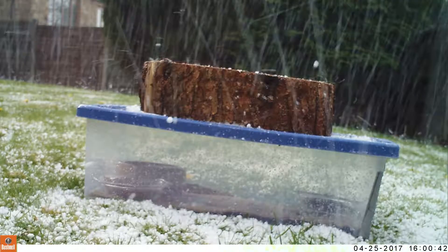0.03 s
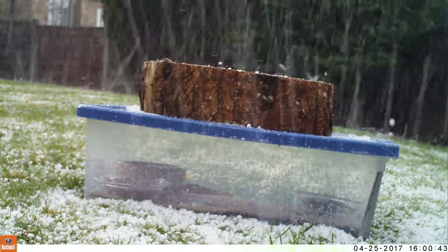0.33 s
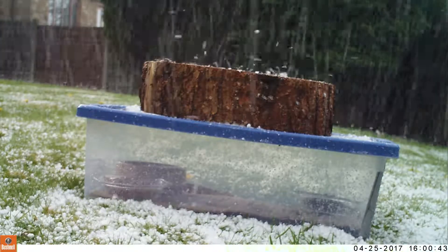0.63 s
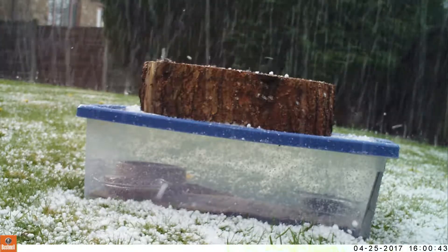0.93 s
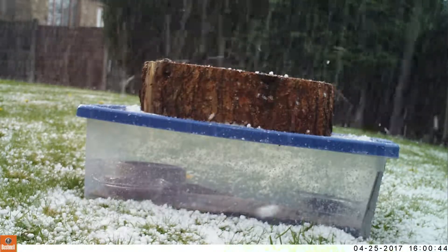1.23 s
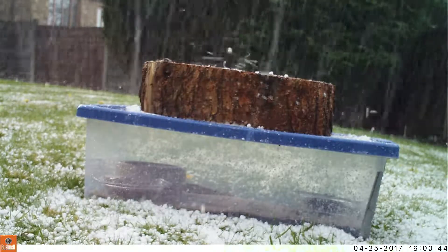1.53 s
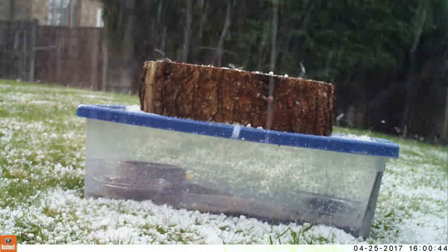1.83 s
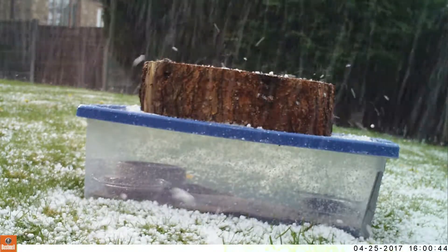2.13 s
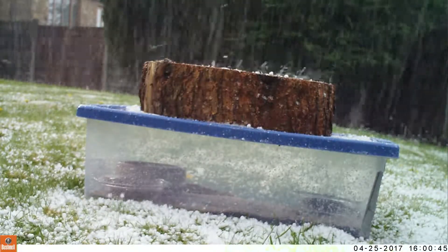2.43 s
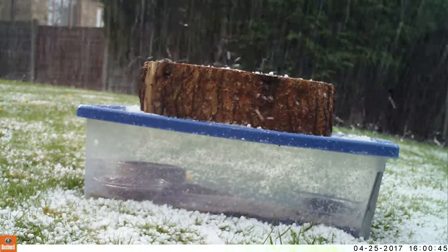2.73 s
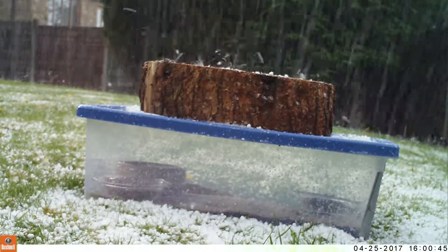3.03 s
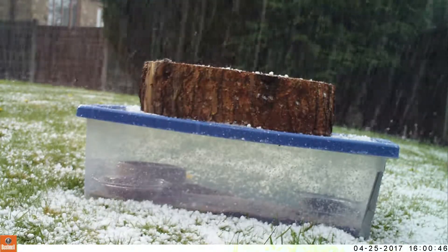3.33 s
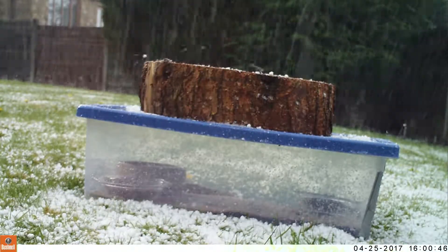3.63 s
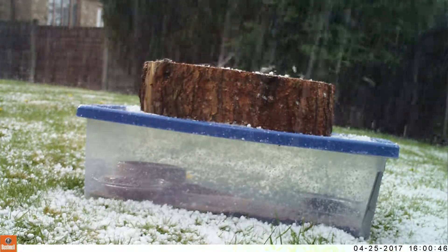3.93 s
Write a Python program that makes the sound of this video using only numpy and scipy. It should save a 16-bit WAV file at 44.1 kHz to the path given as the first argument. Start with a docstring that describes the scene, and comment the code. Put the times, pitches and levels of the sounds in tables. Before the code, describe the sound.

Heavy hail hisses on a garden lawn throughout, with close stones landing as sharp, ringing ticks and faint icy clinks. Wind rumbles and thumps on the microphone, strongest around 0.5 and 1.5 seconds, then dies away by about 3 seconds. Between 1.7 and 2.9 seconds a few stones knock hollowly on a plastic box. The sharpest close hit comes near 3.8 seconds as the hail keeps falling.

```python
"""A garden in heavy hail, with stones falling on a lawn, a log and a plastic box.
Countless far stones merge into a bed of hiss; nearer ones ping, tick and clink on fallen ice,
and a few knock on the box. A sharp ring near 4 kHz, probably the microphone's port, colours the hail.
Underneath, gusts of wind buffet the microphone and die away."""
import sys
import numpy as np
from scipy import signal
from scipy.io import wavfile
from scipy.ndimage import uniform_filter1d

SR = 44100
rng = np.random.default_rng(int(sys.argv[2]) if len(sys.argv) > 2 else 0)


def master_out(mix):
    """Clip the mix to full scale and print it as 16-bit PCM to the path in sys.argv[1]."""
    frames = np.transpose(np.atleast_2d(mix))
    ceiling = np.clip(frames, -1, 1)
    pcm = np.round(ceiling * 32767).astype(np.int16)
    wavfile.write(sys.argv[1], SR, pcm)


N = 176400

# gust envelopes: (time [s], relative rumble level [dB], relative flutter level [dB])
GUST_LEVELS = [(0, -17, -27), (0.15, -21, -34), (0.3, -15, -30), (0.41, -19, -33), (0.48, -13, -27),
               (0.55, -21, -37), (0.65, -25, -42), (0.8, -23, -42), (0.89, -31, -50), (1.03, -24, -45),
               (1.15, -25, -45), (1.22, -19, -34), (1.57, -18, -31.5), (1.64, -26, -46), (1.72, -21, -34),
               (1.77, -30, -51), (2.0, -32, -54), (2.07, -24, -38), (2.17, -28, -48), (2.255, -30, -50),
               (2.28, -22, -38), (2.31, -25, -44), (2.48, -26.5, -48), (2.72, -35, -65), (2.84, -31, -64),
               (2.93, -41, -67), (3.01, -34, -53), (3.13, -44, -64), (3.28, -37, -66), (3.55, -42, -66),
               (3.75, -50, -61), (4.0, -47, -60)]
# tone of the wind's low rumble: (frequency [Hz], relative density [dB])
RUMBLE_SPECTRUM = [(20, 2), (40, -5), (80, -4), (130, -8.5), (200, -18), (300, -26.5), (500, -59)]
# tone of the flutter above it: (frequency [Hz], relative density [dB])
FLUTTER_SPECTRUM = [(100, -0.5), (210, 7), (340, -0.5), (500, -7), (800, -16.5), (1300, -22.5), (2200, -27),
                    (3500, -31)]
# brief buffets within the gusts: (time [s], level [dB])
WIND_BUFFETS = [(0.05, -25.5), (0.278, -24), (0.378, -23), (0.471, -26), (.748, -34), (0.801, -31),
                (1.001, -33), (1.309, -32), (1.428, -28), (1.568, -31), (1.709, -32), (2.063, -36),
                (2.338, -37)]
# strong eddies thumping the microphone: (time [s], depth before the low cut [dB], time to a quarter [s])
EDDY_THUMPS = [(0.012, 0, 0.00085), (0.105, -13, 0.0013), (0.801, -10.5, 0.0013), (1.21, -7.5, 0.0017),
               (1.28, -20, 0.003), (1.383, -6, 0.0049), (1.43, -20.5, 0.00018), (1.49, -14.5, 0.00093),
               (1.57, -19, 0.00025), (1.692, -10, 0.0017), (2.277, -10.5, 0.002), (3.015, -20, 0.0026)]
# strength of the shower: (time [s], gain [dB])
SHOWER_GAIN = [(0, 2), (1.6, 2), (2.1, 2), (2.3, 0.5), (2.55, 2.5), (3.6, 0.5), (4, 2.5)]
# far hiss before the port colours it: (frequency [Hz], relative density [dB])
HISS_SPECTRUM = [(150, 15.5), (400, 5.5), (800, 2.5), (1150, -4), (1550, 3), (2500, 5), (4000, 6),
                 (6000, -9), (7800, -4.5), (10000, -12), (14000, -6.5)]
# pipe resonances of the microphone's port: (frequency [Hz], width [Hz], gain [dB])
PORT_MODES = [(3910, 416, 16.5), (11970, 2270, 3.5)]
# modes of the plastic box under small stones: (frequency [Hz], relative level [dB])
PLASTIC_MODES = [(1530, 13), (1850, -10), (2800, -11)]
# small ice chips ringing all around: (frequency [Hz], relative level [dB])
ICE_MODES = [(5400, 14.5), (6300, 9.5), (8300, -27), (11600, 8.5), (12400, 9)]
# ice chips clinking close by: (time [s], peak before the shower gain [dB], pitch [Hz])
ICE_CLINKS = [(1.397, -44, 8550), (1.915, -40, 11200), (2.161, -41, 11800), (2.358, -40, 11700),
              (2.520, -36, 12100), (2.989, -35.5, 11800), (3.534, -37.5, 6900), (3.607, -33.5, 12200),
              (3.665, -44, 12300)]
# stones knocking on the box: (time [s], peak [dB], pitch [Hz])
BOX_KNOCKS = [(1.742, -26, 1970), (1.958, -33.5, 1610), (2.463, -33, 1590), (2.652, -31.5, 1580),
              (2.817, -32, 2680), (2.855, -39, 1040)]
# soft landings on the grass close by, plus the hard stone at 3.8386 s ringing on (row at 3.8387) and its two
# soft # bounces (rows at 3.8445 and 3.8517): (time [s], peak [dB], ring [Hz])
SOFT_LANDINGS = [(0.3083, -27, 3920), (0.5906, -31, 3900), (0.6391, -25, 3700), (0.7744, -23.5, 3720),
                 (1.476, -27, 3900), (1.7176, -30, 3800), (1.8259, -24, 3710), (2.5056, -27, 4000),
                 (2.5171, -27.5, 3880), (2.5458, -26.5, 3820), (2.6277, -25.5, 3860), (3.8387, -21.5, 3860),
                 (3.8445, -32, 3780), (3.8517, -32, 3870), (3.9215, -28, 4020)]
# hard landings close by: (time [s], peak [dB], ring [Hz], thud against ring [dB], crack against both [dB])
HARD_LANDINGS = [(0.0438, -15.5, 3850, -10, -10), (0.0513, -19, 3840, 5, -12.5),
                 (0.0892, -23, 3700, -4, -11), (0.4273, -20, 3770, -20, -6.5), (0.652, -32, 4300, -17, -17),
                 (0.8126, -22, 3800, -3, -7.5), (0.8787, -24.5, 3880, -13, -16),
                 (1.5988, -14.5, 4020, -8.5, -7), (1.7391, -12, 3820, -29, -24),
                 (1.7437, -20, 3960, -3, -2), (1.8811, -22, 3770, -3, -18), (1.9586, -18, 3410, -8, -19),
                 (2.075, -18, 3890, -24, -10), (2.0961, -27, 3730, -14, -19),
                 (2.175, -26.5, 3880, -13, -12), (2.368, -19, 3450, -3, -26), (2.493, -21, 3840, -24, -6),
                 (2.911, -21.5, 3830, -5, -26), (3.5356, -25, 3530, -2, -9), (3.7654, -26, 4000, -5, 2),
                 (3.8386, -10.5, 3740, 9.5, 1)]


def from_db(db):
    """Decibels to gain."""
    return 10 ** (np.asarray(db) / 20)


def rms_one(x):
    """Scale to rms 1."""
    return x / np.sqrt(np.mean(x ** 2) + 1e-20)


def peak_one(x):
    """Scale to peak 1."""
    return x / np.abs(x).max()


def even(x, seconds=0.1017):
    """Ride out the slow swells of a noise, leaving its fast flicker; rms about 1."""
    return x / np.sqrt(uniform_filter1d(x * x, int(seconds * SR)) + 1e-12)


def envelopes(rows):
    """One envelope for each level column of a breakpoint table."""
    times, *columns = np.transpose(rows)
    return [np.interp(np.arange(N) / SR, times, column) for column in columns]


def add(out, s, sound):
    """Mix a short sound in at s seconds."""
    i = int(s * SR)
    out[i:i + len(sound)] += sound[:N - i]


def cut(x, hz, kind, order=2):
    """Butterworth filter."""
    sos = signal.butter(order, np.clip(hz, 10, .45 * SR), kind, fs=SR, output="sos")
    return signal.sosfilt(sos, x + 1e-18)


def resonate(x, hz, width_hz):
    """A resonance with gain 1 at its top."""
    r = np.exp(-np.pi * width_hz / SR)
    poles = [1, -2 * r * np.cos(2 * np.pi * hz / SR), r * r]
    return signal.lfilter(np.array([1, 0, -1]) * (1 - r * r) / 2, poles, x + 1e-18)


def drift(hz):
    """Smooth random modulation, mostly slower than hz; rms about 1."""
    step, run_in = 20, 4000
    r = np.exp(-2 * np.pi * hz * step / SR)
    white = rng.standard_normal(N // step + run_in + 2)
    slow = signal.lfilter([1], [1, -2 * r, r * r], white)[run_in:]
    return np.interp(np.arange(N) / step, np.arange(len(slow)), rms_one(slow))


def noise(spectrum, flicker_db, tilt_db=0):
    """Third-octave noise bands, each flickering on its own, tilted by tilt_db per octave; rms 1."""
    edges = 18 * 2 ** np.arange(0, 9.9, 1 / 3)
    hz, db = np.transpose(spectrum)
    white, out = rng.standard_normal((2, N + SR // 2)), 0
    for k, (low, high) in enumerate(zip(edges, edges[1:])):
        if low < hz[-1]:
            band = cut(white[k % 2], [low, high], "band")[-N:]
            level_db = np.interp(np.log(low * high) / 2, np.log(hz), db) + tilt_db * np.log2(low / 50)
            out = out + band * from_db(level_db + flicker_db * drift(hz=30.4))
    return rms_one(out)


def impacts(per_s, spread_db):
    """Random clicks, mostly small, now and then large."""
    sizes = from_db(spread_db * np.minimum(rng.exponential(1, N), 4))
    return sizes * rng.choice([-1, 1], N) * (rng.random(N) < per_s / SR)


def port(x):
    """The microphone's port rings at its first two pipe resonances."""
    return x + sum(from_db(db) * resonate(x, hz, width_hz) for hz, width_hz, db in PORT_MODES)


def wind(rumble_trim_db=1.5, flutter_trim_db=2.5):
    """Gusts rumble on the microphone and tear into flutter; strong eddies pull the pressure down."""
    t = np.arange(N) / SR
    rumble_db, flutter_db = envelopes(GUST_LEVELS)
    turbulence = np.minimum(drift(hz=66), 2)
    tilt_db = .24 * (rumble_db - rumble_db.max())   # the rumble darkens as the wind drops
    rumble = even(noise(RUMBLE_SPECTRUM, flicker_db=2.5, tilt_db=tilt_db) * from_db(1.6 * turbulence))
    flutter = even(noise(FLUTTER_SPECTRUM, flicker_db=4.0) * from_db(4.5 * turbulence))
    gusts = from_db(rumble_db + rumble_trim_db) * rumble + from_db(flutter_db + flutter_trim_db) * flutter
    bursts = sum(from_db(db) * np.exp(-((t - s) / 0.0098) ** 2) for s, db in WIND_BUFFETS)
    tearing = even(noise(FLUTTER_SPECTRUM, flicker_db=3.5) * from_db(drift(hz=80)), seconds=0.0205)
    thumps = sum(from_db(db) / (1 + ((t - s) / width) ** 2) ** 2 for s, db, width in EDDY_THUMPS)
    return gusts + bursts * tearing - cut(thumps, 16, "high", order=1)


def hail_bed(hits_per_s=900):
    """Far stones merge into hiss; nearer ones patter, dull on the grass and brighter on the log."""
    grass = cut(impacts(hits_per_s, spread_db=4.5), 3400, "low", order=4)
    log = cut(impacts(hits_per_s, spread_db=4.5), 6000, "low")
    patter = cut(rms_one(grass) + from_db(-9) * rms_one(log), 1700, "high", order=3)
    hiss = noise(HISS_SPECTRUM, flicker_db=2.5)
    return from_db(-59.5) * rms_one(patter) + from_db(-53.5) * hiss


def midground_pings():
    """Stones at middle distance land softly on the grass: narrow blips that set the port ringing."""
    soft = cut(impacts(per_s=110, spread_db=6.0), 3640, "low", order=4)
    return from_db(-64.5) * rms_one(cut(soft, 3160, "high", order=4))


def box_taps():
    """Small stones tap the plastic, each waking one of its short modes."""
    taps = sum(from_db(db) * resonate(impacts(per_s=110, spread_db=3.0), hz, width_hz=75)
               for hz, db in PLASTIC_MODES)
    return from_db(-69) * rms_one(cut(taps, 600, "high"))


def ice_clinks():
    """Stones strike fallen ice: a fine sparkle all around and a few tiny clinks up close."""
    sparkle = sum(from_db(db) * resonate(impacts(per_s=90, spread_db=3.5), hz, width_hz=430)
                  for hz, db in ICE_MODES)
    out = from_db(-62.5) * rms_one(sparkle)
    for s, db, hz in ICE_CLINKS:
        ring = resonate(signal.unit_impulse(SR // 20), hz, width_hz=520)
        add(out, s, from_db(db) * peak_one(resonate(ring, hz, width_hz=2500)))
    return out


def box_knocks():
    """A few stones hit the box, each with one short, hollow note."""
    out, click = np.zeros(N), signal.unit_impulse(SR // 20)
    for s, db, hz in BOX_KNOCKS:
        add(out, s, from_db(db) * peak_one(resonate(click, hz, width_hz=240)))
    return out


def close_pings(attack_s=0.001):
    """Close stones sink into the grass without a click: the ring takes a few cycles to build, then fades."""
    out, t = np.zeros(N), np.arange(SR // 50) / SR
    swell = peak_one((t * np.exp(-t / attack_s)) ** 2)
    for s, db, hz in SOFT_LANDINGS:
        add(out, s, from_db(db) * swell * np.sin(2 * np.pi * hz * t))
    return out


def close_ticks(thud_hz=2900, crumble_s=0.0007):
    """Close stones land hard: a dull thud, a ring of a few milliseconds and a crumbling crack on top."""
    out, click = np.zeros(N), signal.unit_impulse(SR // 20)
    crumble = from_db(-10) * np.exp(-np.arange(len(click)) / (crumble_s * SR))
    thud = peak_one(resonate(resonate(click, thud_hz, width_hz=1400), thud_hz, width_hz=2800))
    for s, db, hz, thud_db, crack_db in HARD_LANDINGS:
        ring = resonate(click, hz, width_hz=430)
        ring = peak_one(resonate(ring, hz, width_hz=1920))   # hard contact builds the ring almost at once
        body = peak_one(cut(ring + from_db(thud_db) * thud, 5730, "low", order=4))
        grit = cut(click + crumble * rng.standard_normal(len(click)), 5200, "high", order=4)
        crack = peak_one(port(grit) + from_db(-5) * resonate(grit, 7200, width_hz=3100))
        add(out, s, from_db(db) * peak_one(body + from_db(crack_db) * crack))
    return out


def scene():
    """Mono mix: the shower swells and eases as one layer, with close hits in front and wind underneath."""
    shower_db, = envelopes(SHOWER_GAIN)
    shower = port(hail_bed() + midground_pings()) + box_taps() + ice_clinks()
    close_hits = box_knocks() + close_pings() + close_ticks()
    return (from_db(shower_db) * shower + close_hits + wind())[None]


def record(dry, ceiling_db=-3, droop_hz=12400, cutoff_hz=13800):
    """Soft clipping rounds the strongest gusts; the top end droops, then is cut steeply."""
    rounded = dry / (1 + (dry / from_db(ceiling_db)) ** 4) ** .25
    dulled = cut(rounded, droop_hz, "low", order=6)
    return signal.sosfilt(signal.ellip(10, .2, 90, cutoff_hz, fs=SR, output="sos"), dulled)


dry = scene()
out = record(dry)
master_out(out)
```